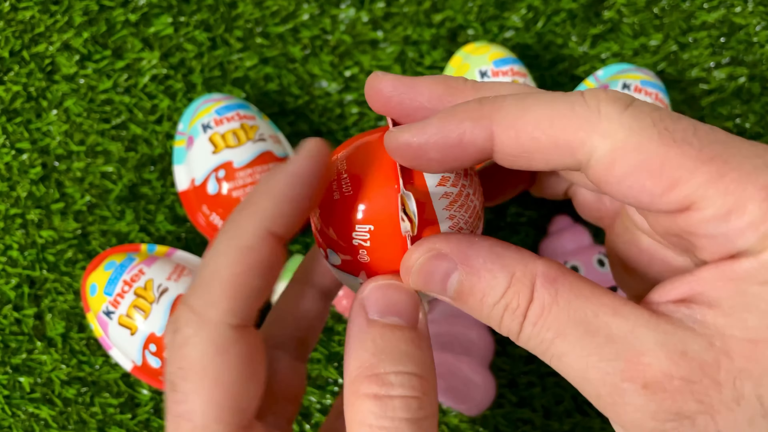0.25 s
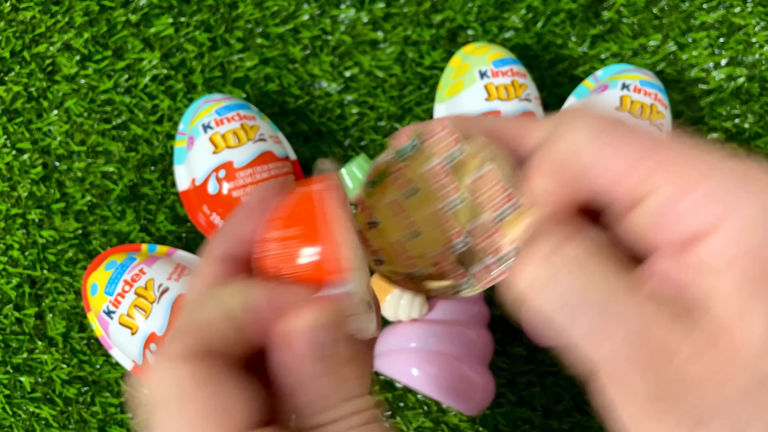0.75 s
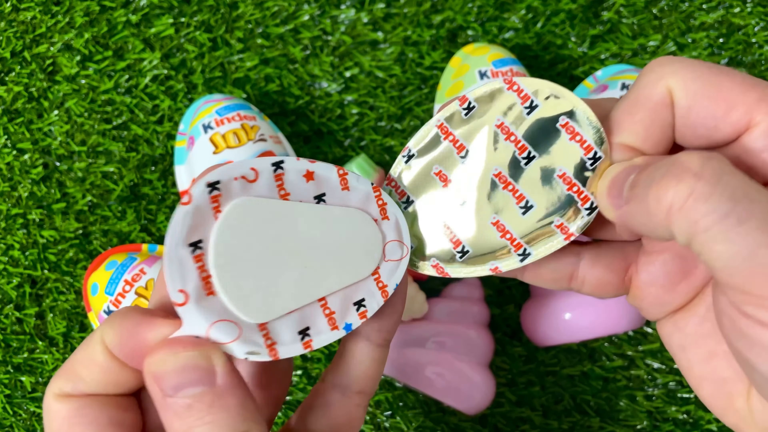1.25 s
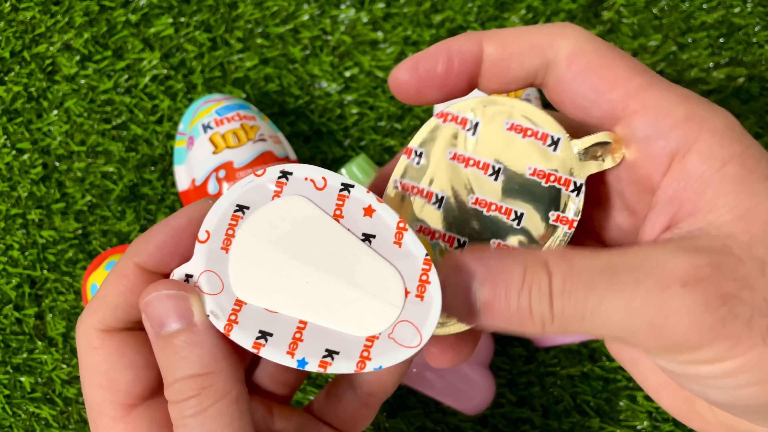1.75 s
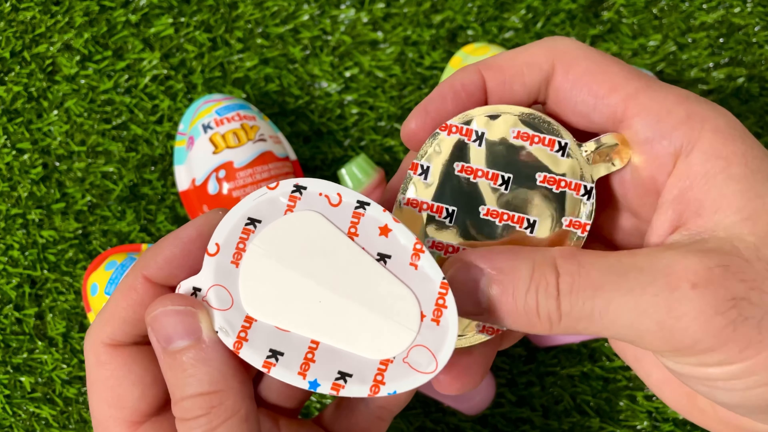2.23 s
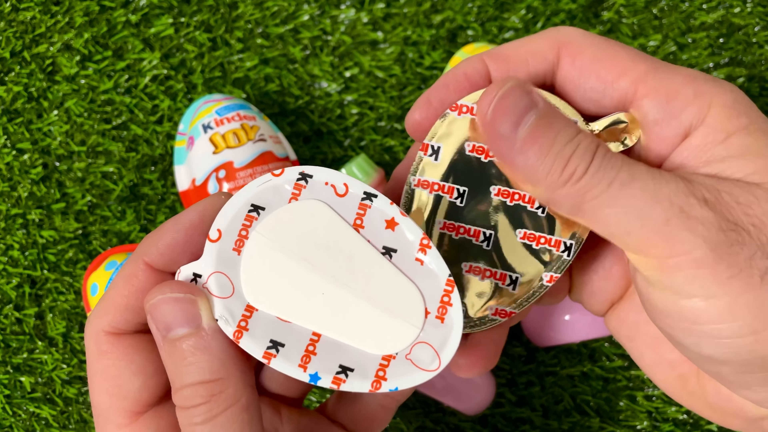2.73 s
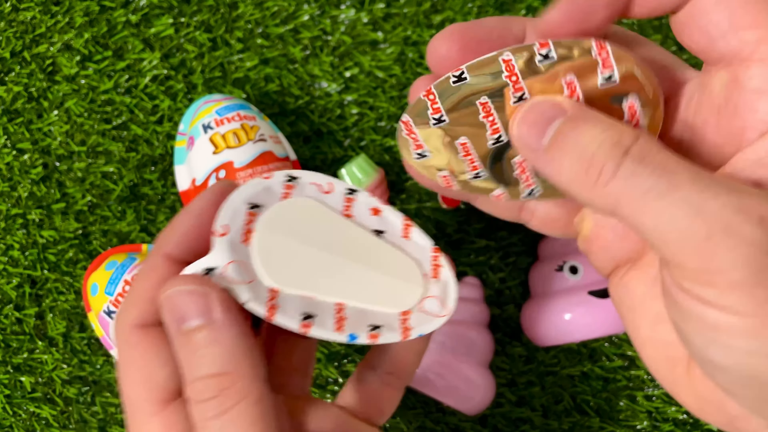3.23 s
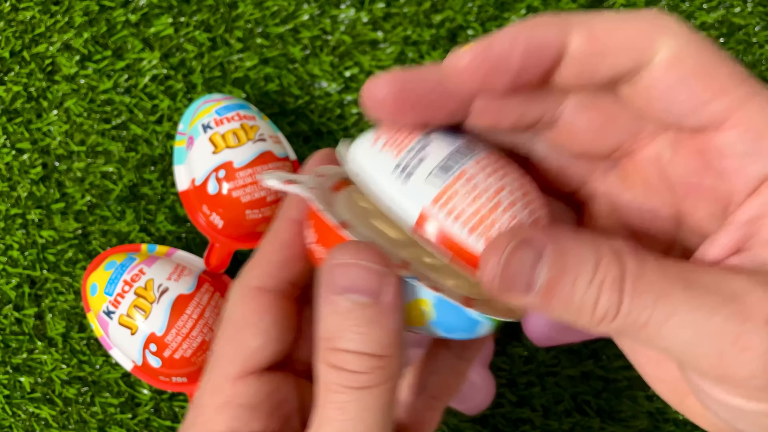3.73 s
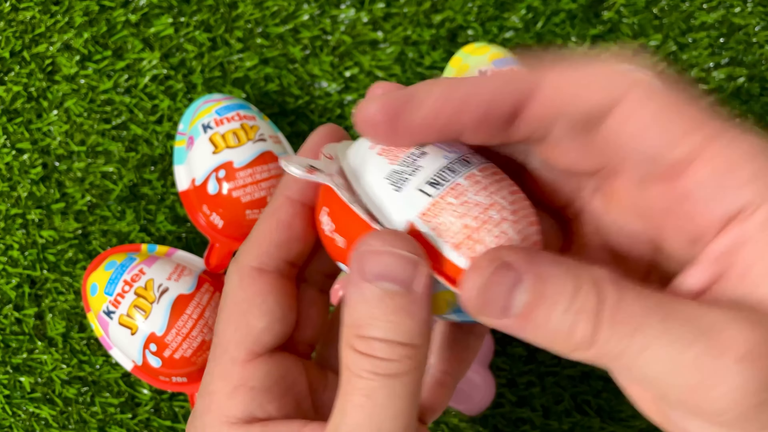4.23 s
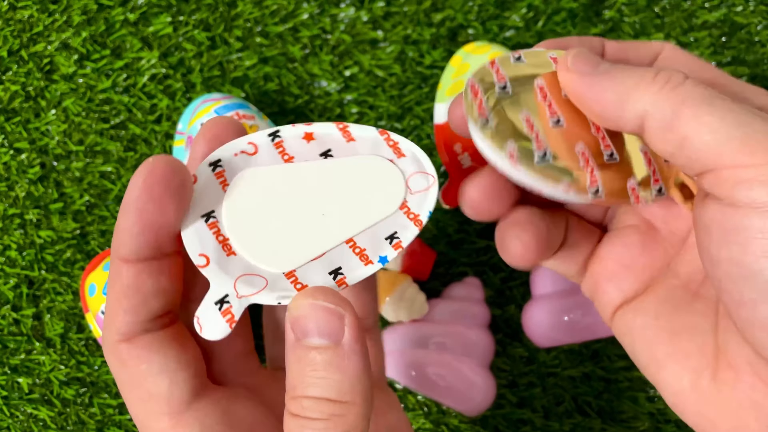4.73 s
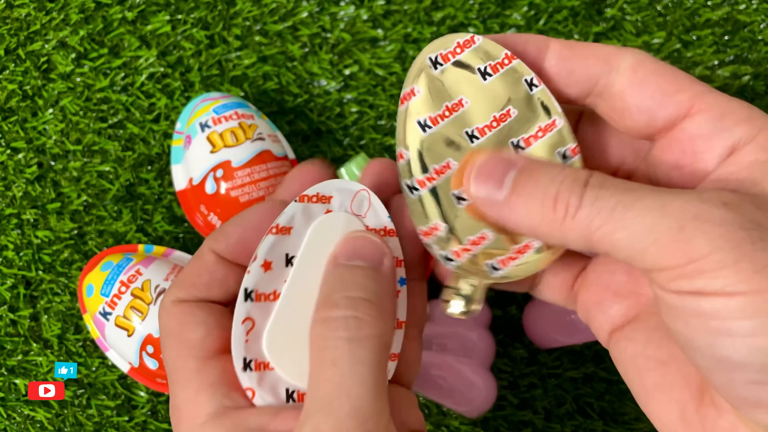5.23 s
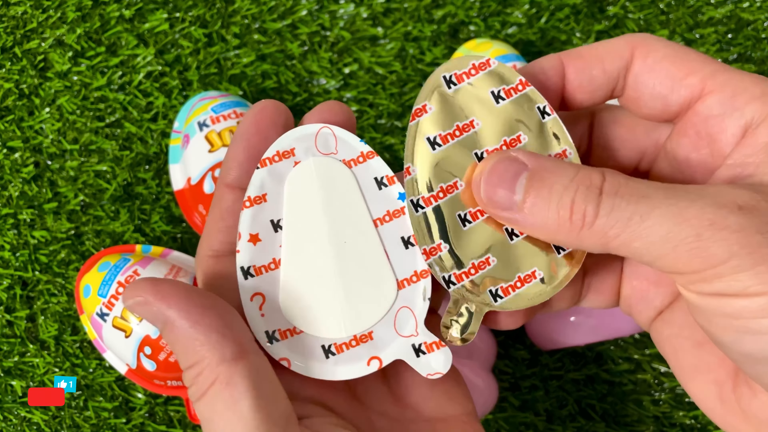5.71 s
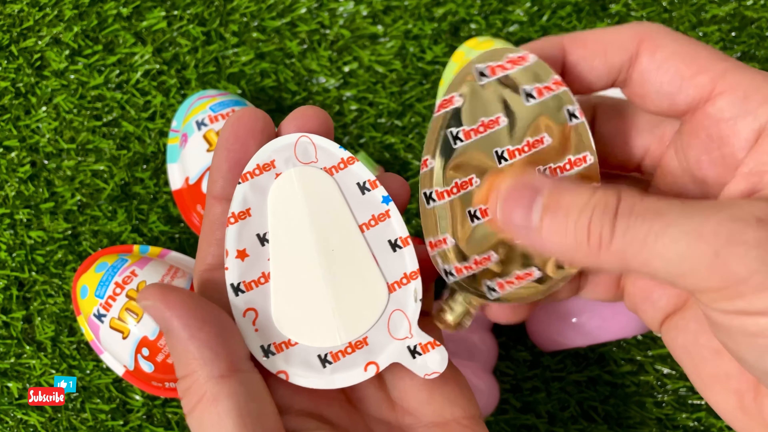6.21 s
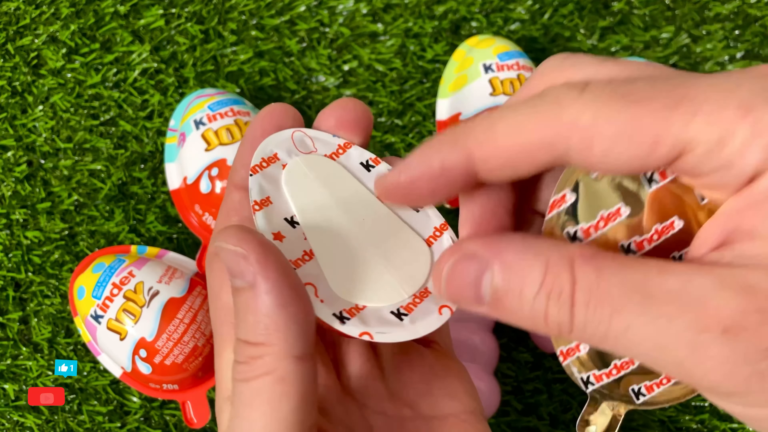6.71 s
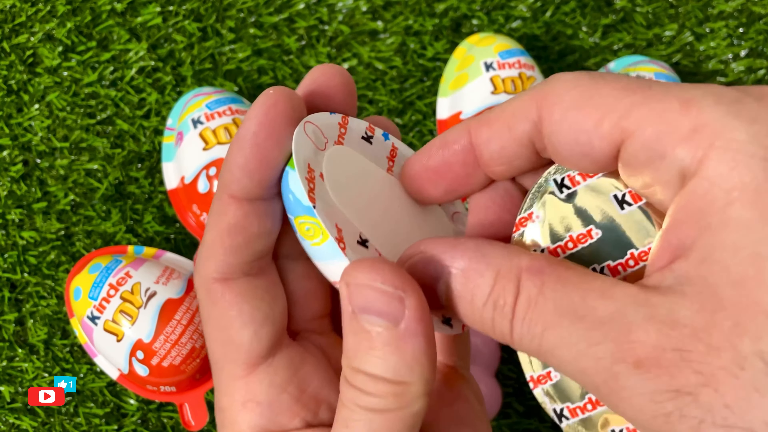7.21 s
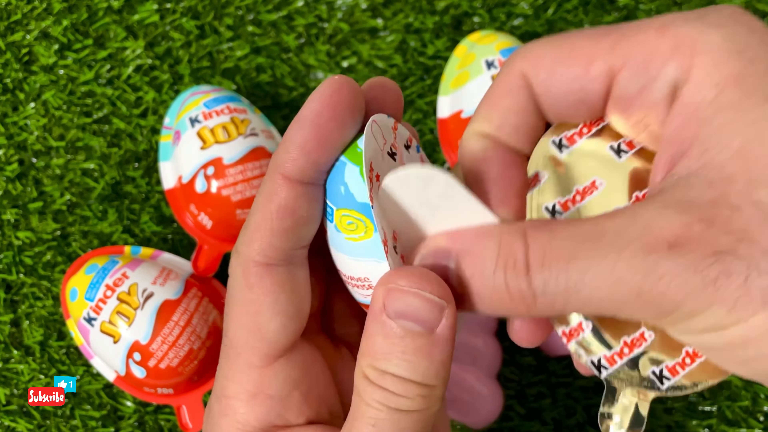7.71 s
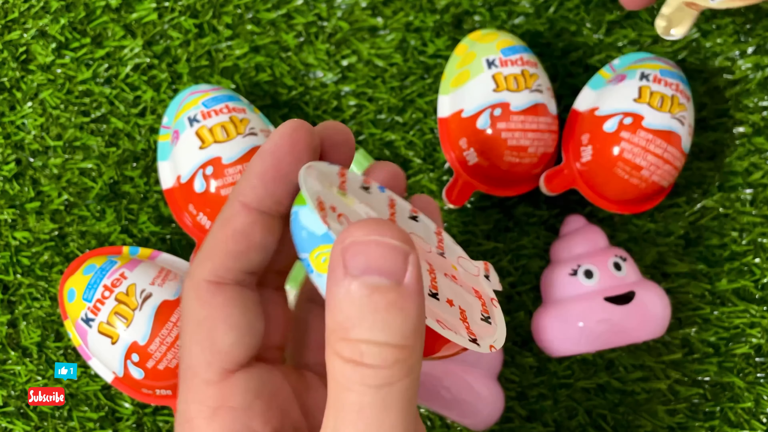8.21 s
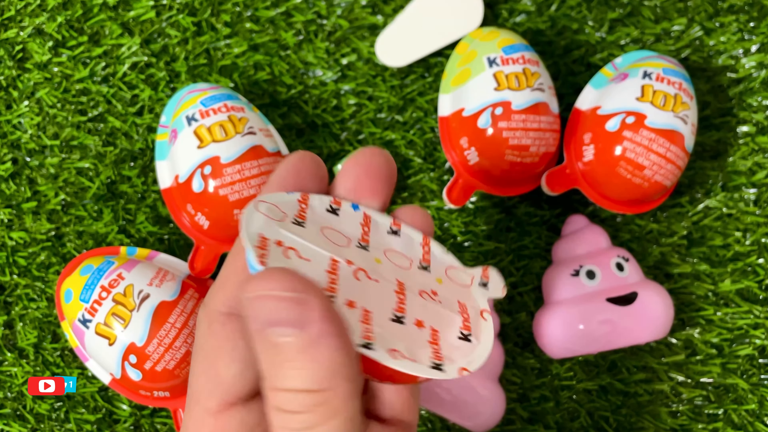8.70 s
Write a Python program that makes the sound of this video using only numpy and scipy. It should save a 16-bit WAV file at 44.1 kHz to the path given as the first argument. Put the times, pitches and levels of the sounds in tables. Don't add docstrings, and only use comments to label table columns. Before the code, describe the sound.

Fingers slide and flick over glossy film, with tiny creases crackling underneath. A lid pops loose in a tight cluster of bright snaps; buckling clicks follow in uneven groups, then soft knocks of the halves, more turning clicks, and a hard peeling buckle. It ends in faint ticks. Close phone microphone, little bass, dry small indoor space.

```python
import sys
import numpy as np
from scipy import signal
from scipy.fft import rfft, irfft, next_fast_len
from scipy.io import wavfile
from scipy.ndimage import uniform_filter1d

SR = 44100
rng = np.random.default_rng(int(sys.argv[2]) if len(sys.argv) > 2 else 0)


def inscribe(sig):
    pcm = np.round(np.clip(np.atleast_2d(sig).T, -1, 1) * 32767)
    wavfile.write(sys.argv[1], SR, pcm.astype(np.int16))


def volts_from_decibels(level):
    exponent = np.asarray(level, float) / 20
    return 10 ** exponent


N = 394694

# (time [s], peak [dB], pitch [Hz], palm thump against the peak [dB])
KNOCK_EVENTS = [
    (0.729, -44.5, 395, -15),
    (3.832, -45.5, 305, -38),
    (3.876, -53.5, 297, -37),
    (4.011, -42, 317, -24.5),
    (4.218, -43, 357, -17.5),
    (7.621, -39.5, 339, -17.5),
]


def along(table, hz):
    f, v = np.transpose(table)
    return np.interp(np.log(hz + 1), np.log(f + 1), v)


def shape(x, gain):
    size = next_fast_len(x.shape[-1])
    hz = np.arange(size // 2 + 1) * SR / size
    return irfft(rfft(x, size) * gain(hz), size)[..., :x.shape[-1]]


def hush(colour):
    x = shape(rng.standard_normal(N), lambda hz: volts_from_decibels(along(colour, hz)))
    return x / x.std()


def walk(rate):
    k = int(SR / rate)
    return uniform_filter1d(np.repeat(rng.standard_normal(N // k + 1), k), k)[:N]


def rings(hz, octaves, t60, rise, count, size=900):
    chance = rng.random((len(hz), 4, count, 1)).transpose(1, 0, 2, 3)
    step = (np.arange(count)[:, None] + chance[0]) / count - .5
    f = np.minimum(hz[:, None, None] * 2 ** (octaves * step), .45 * SR)
    slow = 2 ** (-octaves * step)
    t = (np.arange(size) - size // 4) / SR - rise * ((1 + chance[1]) * slow - 1.5)
    swell = np.exp(-(t / rise) ** 2)
    decay = np.exp(-np.log(1000) * t / (t60 * np.sqrt(slow) * (.5 + chance[2])))
    envelope = np.where(t < 0, swell, decay)
    loud = np.exp(-4.0 * step ** 2) / np.sqrt(slow)
    burst = (envelope * loud * np.sin(2 * np.pi * (f * t + chance[3]))).sum(axis=1)
    return burst / np.abs(burst).max(axis=1, keepdims=True)


def place(s, bursts):
    size = bursts.shape[1]
    at = (s * SR).astype(int)[:, None] + np.arange(size)
    return np.bincount(at.ravel(), bursts.ravel(), N + size)[size // 4:][:N]


def air():
    # (frequency [Hz], level [dB])
    tone_colour = [(12, -44.5), (20, -19), (53, -6), (110, -12.5), (158, -11.5), (210, -18), (280, -15),
                   (520, -28.5), (3250, -40), (6180, -27.5), (6720, -17), (7950, -59.5), (16000, -38.5)]
    # (frequency [Hz], side minus mid [dB])
    tone_width = [(100, -17.5), (700, 7), (2400, 5), (7000, -9), (15000, 2.5)]
    mid = hush(tone_colour)
    side = shape(hush(tone_colour), lambda hz: volts_from_decibels(along(tone_width, hz)))
    return volts_from_decibels(-73.5) * np.array([mid + side, mid - side])


def touch():
    # (start [s], length [s], rub [dB], gloss: hiss against the rub [dB])
    slide_events = [(0.067, 0.39, -72.5, 6), (0.562, 0.044, -68.5, 15.5), (0.74, 0.14, -49.5, 3.5),
                    (0.927, 0.13, -59, -37), (1.419, 0.35, -59.5, -3), (1.56, 0.12, -64, 4),
                    (1.838, 0.35, -52, -5.5), (2.253, 0.53, -58.5, -3), (2.887, 0.77, -64, -2.5),
                    (3.462, 0.084, -56.5, 6.5), (3.855, 0.087, -56, -1), (4.021, 0.037, -55.5, -2),
                    (4.238, 0.06, -51, -3), (4.594, 0.046, -71.5, 15), (4.646, 0.16, -57, 2.5),
                    (4.841, 0.096, -47, -2.5), (5.086, 0.33, -56, 7.5), (5.458, 0.17, -61.5, 5.5),
                    (5.882, 0.82, -69.5, 5.5), (6.618, 0.22, -70, 2), (6.942, 0.3, -62, 6),
                    (7.273, 0.18, -55.5, -11), (7.424, 0.43, -48.5, -0.5), (8.018, 0.009, -43.5, -2),
                    (8.1, 0.16, -59.5, 3), (8.328, 0.68, -67.5, 0)]
    # (time [s], rub [dB])
    flick_events = [(0, -63), (0.132, -64.5), (0.226, -59.5), (0.749, -39.5), (1.105, -57), (3.223, -52),
                    (3.377, -47.5), (4.479, -62), (4.535, -50), (5.121, -47.5), (5.396, -57), (6.05, -71),
                    (6.512, -41), (6.574, -43), (6.882, -48), (7.66, -47), (8.89, -56)]
    slide_attack, slide_release, flick_attack, flick_release = 598.5, 249, 599, 448.5
    flick_gloss_db, resting_db = 8.5, -88
    t = np.arange(0, N, 100)[:, None] / SR
    s, length, db, gloss_db = np.transpose(slide_events)
    slides = db - slide_attack * np.maximum(s - t, 0) - slide_release * np.maximum(t - s - length, 0)
    s, db = np.transpose(flick_events)
    flicks = db - flick_attack * np.maximum(s - t, 0) - flick_release * np.maximum(t - s, 0)
    power = volts_from_decibels(2 * np.hstack([slides, flicks]))
    total = power.sum(axis=1) + volts_from_decibels(2 * resting_db)
    gloss = power @ np.append(gloss_db, flick_gloss_db + 0 * s) / total
    return [np.interp(np.arange(N) / SR, t[:, 0], v) for v in (10 * np.log10(total), gloss)]


def rub():
    # (frequency [Hz], level [dB])
    rub_colour = [(350, -29.5), (800, -19), (1500, -3), (2600, -1.5), (4000, -5), (6000, -20.5)]
    # (frequency [Hz], level [dB])
    hiss_colour = [(2500, -23.5), (4000, -4.5), (6500, -4), (9500, -3), (12000, -7.5), (14000, -18.5),
                   (16500, -40)]
    held, gloss = touch()
    pressure = held + 2.5 * walk(70) + 3.2 * walk(700)
    film = hush(rub_colour) + volts_from_decibels(gloss) * hush(hiss_colour)
    out = 0
    for hz in 400 * 2 ** np.arange(0, 5.6, .5):
        patch = shape(film, lambda f: np.cos(np.pi * np.clip(np.log2((f + 1) / hz), -.5, .5)) ** 2)
        out = out + volts_from_decibels(2.5 * walk(13) + 1.5 * walk(60)) * patch
    return volts_from_decibels(pressure - 7.5) * out


def crackle(count=1500):
    per_s, crackle_db, spread_db = 160, 1, 11
    chance = rng.random((count, 3)).T
    s = np.cumsum(-np.log(1 - chance[0])) / per_s
    db = np.interp(s * SR, np.arange(N), touch()[0]) + crackle_db + spread_db * chance[1] ** 2
    pitch = 1600 * 2 ** (1.8 * chance[2])
    tiny = volts_from_decibels(db)[:, None] * rings(pitch, 0.87, 0.00094, 0.00017, count=3, size=300)
    inside = s < N / SR
    return place(s[inside], tiny[inside])


def crease(s, peak_db, panel_hz, hollow_db, crisp_db, foil_db, edge_db):
    same = np.ones(len(s))

    def part(delay, db, *ring, count):
        return place(s + delay, volts_from_decibels(peak_db + db)[:, None] * rings(*ring, count=count))

    panel = part(-.0002, 1.0, panel_hz, 1.7, 0.0066, 0.00035, count=11)
    hollow = part(0.00085, hollow_db - 13.5, 750 * same, 1.1, 0.00027, 0.0011, count=4)
    crisp = part(-.0003, crisp_db - 2.0, 5800 * same, 0.97, 0.0054, 0.00032, count=7)
    foil = part(-.0004, foil_db - 0.85, 10800 * same, 0.91, 0.008, 0.00032, count=9)
    edge = part(-.0004, foil_db + edge_db, 13900 * same, .45, .002, .0003, count=4)
    return panel + hollow + crisp + foil + edge


def clicks():
    # (time [s], peak [dB], panel pitch [Hz], brightness [dB])
    pull_ticks = [(0.1619, -46.5, 2500, -16), (0.253, -49.5, 2420, -17), (0.555, -44, 3660, 16),
                  (0.561, -35.5, 3570, 3), (0.6039, -31.5, 2260, -13), (0.6414, -63, 3910.0, 23.5),
                  (0.686, -33.5, 3730, 5.5), (0.7004, -30, 2760, -9), (0.8262, -28, 2640, -15.5),
                  (0.831, -24.5, 2860, -11), (0.88, -33.5, 2950, -4), (0.923, -27, 2180, -23),
                  (0.95, -30.5, 2160, -7.5), (1.021, -40.5, 2040, -16.5), (1.4071, -36, 1840, -29.5)]
    press_ticks = [
        (1.93, -26, 2030, -23),
        (2.2438, -24.5, 1650, -25),
        (2.508, -29, 2100, -5.5),
        (2.6467, -27, 2450, -22),
        (2.6839, -27.5, 2130, -11.5),
        (2.811, -43, 1460, -19.5),
        (3.0934, -26.5, 2840, -19),
        (3.154, -43, 1980, -29),
    ]
    tap_ticks = [
        (3.6895, -40.5, 2270, 4.5),
        (4.0117, -21, 1510, -2),
        (4.2231, -24, 2045, 1),
        (4.2817, -36.5, 1396, 1),
        (4.3485, -24.5, 2380, -16),
    ]
    turn_ticks = [(4.6468, -20.5, 3010, -11), (4.7009, -37.5, 2100, 2), (4.993, -30, 1690, -7.5),
                  (5.1209, -24, 1900, -25), (5.169, -34.5, 4070, 2), (5.327, -39, 2770, 1),
                  (5.367, -31.5, 3870, 4), (5.4168, -31, 2790, -25.5), (5.8726, -32.5, 3100, -13.5),
                  (6.19, -31.5, 3270, -24), (6.5142, -21.5, 3930, -7), (6.517, -27, 3730, -17)]
    peel_ticks = [(7.229, -21.5, 1860, -15), (7.391, -26, 2230, 7), (7.478, -21.5, 1910, -11),
                  (7.4962, -23, 1850, -26), (7.5854, -16.5, 2020, -5), (7.651, -24.5, 2700, -10),
                  (7.721, -31, 1490, -16), (7.9271, -21, 1710, -10), (8.1085, -14.5, 1620, -6.5),
                  (8.376, -45.5, 1717, -16), (8.419, -49.5, 1990, -21), (8.4692, -43.5, 2005, 5.5),
                  (8.496, -45.5, 1710, -18.5), (8.9004, -29.5, 1490, -4), (8.9142, -41, 1610, -3)]
    # (time [s], peak [dB], panel pitch [Hz],
    # brightness [dB])
    fine_ticks = [(0.1493, -50, 2400, -15), (0.249, -47.5, 2370, -15), (0.5462, -59, 2657, 6.5),
                  (0.551, -64, 3690.0, 14), (0.5686, -45.5, 3044, 6), (0.5848, -61.5, 2943, 10),
                  (0.6127, -46, 3120, -3), (0.6357, -61.5, 3986, 18), (0.6898, -36.5, 3260, 1),
                  (0.7163, -38.5, 2527, 4), (0.7687, -28, 2705, 3), (0.7817, -36, 2550, -3),
                  (0.7931, -30, 2940, 2.5), (0.8175, -27, 2570, -16), (0.8599, -21, 2230, -17),
                  (0.9398, -25, 1950, -17), (0.9897, -19.5, 2070, -25), (1.0248, -45, 2360, -20),
                  (1.816, -47.5, 2500, -15), (1.8976, -32, 2144, -34), (2.009, -30, 2200, -12),
                  (2.218, -43, 1650, -19), (2.32, -33, 2255, -23), (2.352, -35, 2070.0, -14),
                  (2.3652, -49, 2390.0, 10), (2.389, -29, 1540, -31), (2.5046, -32, 2050, -21),
                  (2.5103, -21, 1820, -13.5), (2.5601, -31, 2070, -22.5), (2.6214, -33.5, 2150, -10),
                  (2.8462, -36, 1730.0, -29), (2.9584, -14.5, 2860, -18), (3.196, -29.5, 2650, -1),
                  (3.2924, -43, 2350, -5), (3.4023, -63, 2550.0, -16), (3.4721, -49, 2530, -16),
                  (3.7151, -46.5, 3760, 5), (3.8493, -26, 3180, -1), (4.0215, -32, 1850, -3),
                  (4.0613, -48.5, 2820, 7), (4.0686, -37.5, 2740, -12), (4.218, -40.5, 3250, 4),
                  (4.2306, -33, 1600, -7), (4.2395, -57, 2790.0, 16), (4.2568, -43, 2130, 4),
                  (4.2852, -48, 2670, 15), (4.2897, -38, 3280, 2), (4.2944, -44, 1960, -3),
                  (4.3384, -51, 2380, -20), (4.4486, -56, 2010, 8), (4.505, -44.5, 2350, 0),
                  (4.7255, -41, 3080, -7.0), (4.9088, -44, 2540, -14), (5.1062, -38, 2370, -13.5),
                  (5.208, -38, 2460, -5), (5.3708, -34.5, 2100, -2.5), (5.4267, -41, 2800, -10),
                  (5.5141, -39.5, 1950, -22), (6.0471, -46, 2590, -19), (6.0526, -50, 2290, -13.5),
                  (6.143, -36.5, 2630, 6), (6.147, -40, 2310, -16), (6.477, -37, 2820, -13.5),
                  (6.6363, -54, 3470, 9), (6.6673, -45, 3780, -2), (6.7429, -50.5, 2680.0, 1),
                  (6.8251, -50.5, 2750, 3.5), (7.2801, -46, 3260, 1), (7.522, -37.5, 3020.0, 4.5),
                  (7.6176, -27.5, 1510, -18), (7.7443, -33, 1892, -12), (7.7506, -33, 1527, -12),
                  (8.2017, -54, 2110, -19.5), (8.3403, -52, 1680, -13), (8.3467, -52, 1720, -16),
                  (8.3694, -53, 2044, -24.5), (8.5042, -46, 2180.0, -17), (8.5413, -58, 2260, 9),
                  (8.561, -51, 2300.0, 6), (8.6966, -49.5, 2090, -19), (8.8476, -54, 2560, -14.5),
                  (8.8635, -45, 2350, -18), (8.867, -52, 2670, -14.5), (8.9487, -39, 2545, -2)]
    # (time [s], peak [dB], panel pitch [Hz], hollow [dB], crisp [dB]),
    # the last two against the peak
    pull_snaps = [
        (0.7348, -13.5, 3360, 1, 8),
        (0.7333, -20, 3605, -22.5, -6),
        (0.738, -12.5, 2970, -23.5, 5),
        (0.7405, -20, 2464, -21.5, 2.5),
        (0.7432, -14.5, 2140, 4.5, 7),
        (0.7517, -19.5, 2815, -15, -10),
        (0.757, -29, 2300, -27, -4),
        (0.7613, -19, 2650, -21, 1.5),
        (0.8619, -21, 2840, -5.5, -1),
    ]
    press_snaps = [(1.8364, -14, 2320, -49, -13), (1.9512, -17, 3380, -3.5, -9.5),
                   (1.9681, -11, 2460, -14.5, -6.5), (1.995, -12.5, 2710, -18, -2),
                   (2.0392, -17, 1980, -44, -13.5), (2.057, -20.5, 2350, -34, -8.5),
                   (2.1077, -8.5, 2820, -30.5, -9), (2.1158, -12, 2520, -25, -8.5),
                   (2.1241, -12.5, 1900, -11, -5), (2.3353, -20.5, 2390, -11.5, -14),
                   (2.3719, -19.5, 2070, -5, -6.5), (2.3763, -17.5, 2710, -2.5, -0.5),
                   (2.4222, -19.5, 2560, -18.5, -8), (2.4273, -18.5, 1760, 2, -6),
                   (2.4894, -18, 1930, -36.5, -6), (2.519, -8.5, 2260, -52.5, -13.5),
                   (2.5747, -8.5, 2590, -4.5, -6), (2.6936, -15.5, 3810, -10, -6),
                   (2.7058, -17, 3070, -29, -4.5), (2.8503, -19, 2210, -38, -14.5),
                   (2.88, -9.5, 3330, -16, -10), (3.1801, -22.5, 2450, -13, -11),
                   (3.1891, -17, 2620, -52, -5.5)]
    turn_snaps = [(3.8368, -21.5, 2400, -19, 3.5), (3.8809, -20, 2430, -33, 2.5),
                  (3.8848, -14.5, 2174, -41, -4), (4.757, -15, 2280, -1.5, -5.5),
                  (4.7754, -13, 2470, -32, -5.5), (4.8068, -18.5, 2560, -2.5, -3.5),
                  (4.8203, -15, 3100, -49, -6.5), (5.0373, -16, 3850, -17, -6.5),
                  (5.4564, -16.5, 1910, -26, -2.5), (5.4693, -19, 2615, -13, -1),
                  (6.1237, -14.5, 2800, -49, -1), (6.2214, -14.5, 2950, -11.5, 1.5),
                  (6.438, -16.5, 3400, -16.5, -1)]
    peel_snaps = [(7.1441, -4.5, 2308, -25, -5.5), (7.2134, -21, 1720, -13, -20),
                  (7.4245, -18, 2780, -36.5, -11.5), (7.4311, -19, 2210, -38, -2.5),
                  (7.4471, -17, 2280, -36.5, -5.5), (7.4706, -21, 2140, -24.5, 3),
                  (7.4966, -16, 4150, -29, 7), (7.5548, -14.5, 1660, -19.5, -15),
                  (7.5598, -18.5, 1690, -17.5, -16.5), (7.5899, -10.5, 2730, -42, 6),
                  (7.621, -4, 3140, -12.5, 0.5), (7.6237, -5.5, 1620, -7, 2),
                  (7.6258, -6.5, 1330, -0.5, -7), (7.763, -22, 2050, -10, -20),
                  (7.7885, -9.5, 1860, -11.5, -3.5), (7.8124, -24.5, 2200, -42, -19),
                  (7.8167, -15.5, 1860, -32, -17.5), (7.949, -19.5, 1420, 7, -3),
                  (8.1112, -18.5, 1420, -9, -1)]
    ticks = pull_ticks + press_ticks + tap_ticks + turn_ticks + peel_ticks + fine_ticks
    s, peak_db, panel_hz, bright_db = np.transpose(ticks)
    foil_db = bright_db - 1 + 0.2 * np.minimum(bright_db, 0)
    both = crease(s, peak_db, panel_hz, -12, bright_db, foil_db, -10.5)
    for snaps, foil_share_db, edge_db in ((pull_snaps, -3, -19), (press_snaps, -4, -12),
                                          (turn_snaps, -4.5, -27), (peel_snaps, -2, -12)):
        rows = np.transpose(snaps)
        both = both + crease(*rows, rows[-1] + foil_share_db, edge_db)
    return signal.sosfilt(signal.butter(5, 600, "high", fs=SR, output="sos"), both)


def pats():
    # (time [s], peak [dB])
    pat_events = [(0.604, -55), (0.986, -50), (7.62, -31), (1.947, -53), (2.108, -47), (4.701, -53.5),
                  (5.116, -56), (5.382, -50.5), (6.221, -53), (7.784, -44.5), (8.899, -54)]
    s, peak_db = np.transpose(pat_events)
    soft = rings(362 + 0 * s, 1.4, 0.05, 0.0045, count=4, size=2000)
    return place(s + 0.0025, volts_from_decibels(peak_db)[:, None] * soft)


def swipes(size=8192):
    # (start [s], length [s], level [dB], patch pitch [Hz])
    swipe_events = [(0.643, 0.033, -58, 9500), (0.94, 0.018, -43, 2080), (1.478, 0.087, -71, 3620),
                    (1.622, 0.088, -65, 2250), (1.727, 0.053, -65, 4020), (2.14, 0.1, -71, 2500),
                    (2.872, 0.081, -62, 3900), (3.356, 0.048, -62.5, 1210), (3.554, 0.019, -65, 4980),
                    (4.696, 0.036, -59, 4600), (4.88, 0.05, -52, 2820), (5.154, 0.041, -58, 3500),
                    (5.254, 0.078, -61, 4450), (5.383, 0.059, -53, 1700), (5.405, 0.028, -49.5, 4340),
                    (6.042, 0.015, -63.5, 2250), (6.366, 0.1, -68.5, 2600), (6.406, 0.023, -55.5, 6500),
                    (6.635, 0.042, -64, 4000), (6.74, 0.013, -62, 2590), (6.802, 0.031, -66, 3100),
                    (6.93, 0.052, -64, 4060), (7.017, 0.11, -65, 3400), (7.164, 0.1, -60, 2920),
                    (7.267, 0.03, -64, 4430), (8.13, 0.086, -65, 1340), (8.463, 0.011, -62.5, 4030),
                    (8.713, 0.03, -73.5, 5150), (8.84, 0.075, -63, 2540)]
    octaves, edge_s = 0.3, 0.0016
    s, length, db, hz = (v[:, None] for v in np.transpose(swipe_events))
    t = (np.arange(size) - size // 4) / SR
    noise = rng.standard_normal((len(s), size))
    grain = shape(noise, lambda f: np.exp(-(np.log2((f + 1) / hz) / octaves) ** 2))
    outside = np.maximum(np.maximum(-t, t - length), 0)
    hold = np.exp(-(outside / edge_s) ** 2)
    rustle = volts_from_decibels(db) * hold * grain / grain.std(axis=1, keepdims=True)
    return place(s[:, 0], rustle) * volts_from_decibels(0.99 * walk(330))


def knocks():
    s, peak_db, hz, thump_db = np.transpose(KNOCK_EVENTS)
    t = np.arange(2400) / SR
    turns = hz[:, None] * (0.3 * t + 0.0098 * (1 - np.exp(-t / 0.0082)))
    cup = (1 - np.exp(-t / 0.0014)) * np.exp(-t / 0.0063) * np.sin(2 * np.pi * turns)
    cup = place(s + 600 / SR + 0.0037, volts_from_decibels(peak_db + 17.0)[:, None] * cup)
    thump = rings(100 + 0 * hz, 1.0, 0.051, 0.00076, count=4, size=4000)
    palm = place(s + 0.0028, volts_from_decibels(peak_db + thump_db + 15.0)[:, None] * thump)
    return cup + palm


def hum():
    # (pitch [Hz], waver [Hz], level [dB], start [s], end [s])
    motors = [
        (160, 1.2, -81, 3.35, 6.9),
        (143, 2.5, -83, 1.4, 2.35),
    ]
    out = 0
    for hz, waver_hz, db, start, end in motors:
        x = np.sqrt(2) * np.sin(2 * np.pi * np.cumsum(hz + waver_hz * walk(18)) / SR) * volts_from_decibels(3.2 * walk(2.6))
        fade = np.interp(np.arange(N) / SR, [start - .1, start, end, end + 0.22], [0, 1, 1, 0])
        out = out + volts_from_decibels(db) * x * fade
    return out


def table_top():
    # (frequency [Hz], level [dB], t60 [s])
    table_modes = [(157, -28, 0.44), (222, -17.5, 0.58), (320, -26.5, 0.35)]
    s, peak_db = np.transpose(KNOCK_EVENTS[1:])[:2]
    t = np.arange(16000) / SR
    pair = rng.random((len(s), 2, 1))
    ring = 0
    for hz, db, t60 in table_modes:
        twin_hz = hz * (1 + .06 * (pair[:, 0] - .5))
        twin = 0.44 * np.sin(2 * np.pi * (twin_hz * t + pair[:, 1]))
        ring = ring + volts_from_decibels(db - 5 - 60 * t / t60) * (np.sin(2 * np.pi * hz * t) + twin)
    ring = ring * (1 - np.exp(-t / 0.017))
    return place(s + 4000 / SR, volts_from_decibels(peak_db + 7.5)[:, None] * ring)


def ports(x, lead):
    # (frequency [Hz], lead of the left port [rad])
    port_phase = [(280, .15), (550, .7), (1000, .05), (2500, .35), (3300, .7), (5300, .25), (7900, 1.7),
                  (10000, 2.3), (12000, 2.96)]
    # (frequency [Hz], left minus right [dB])
    port_balance = [(100, -1.3), (500, -2.8), (1200, -1.1), (5000, -1.0), (9000, 0)]

    def tilt(hz):
        return volts_from_decibels(along(port_balance, hz) / 2) * np.exp(.5j * lead * along(port_phase, hz))

    return np.array([shape(x, tilt), shape(x, lambda hz: 1 / tilt(hz))])


def room(x, size=22050):
    # (delay [s], level [dB])
    echoes = [
        (.0022, -27.5),
        (.0045, -24),
        (0.0103, -26),
    ]
    # (frequency [Hz], t60 [s])
    room_t60 = [(200, 0.35), (900, .17), (2500, 0.16), (12000, .09)]
    # (frequency [Hz], tail against the direct sound [dB])
    room_level = [(150, -21), (270, -10.5), (1200, -37), (3000, -26.5), (8000, -25.5), (13000, -41.5)]
    t = np.arange(size) / SR
    delay, echo_db = np.transpose(echoes)
    early = place(delay, volts_from_decibels(echo_db)[:, None])[:size]
    shared, own = rng.standard_normal(size), rng.standard_normal((2, size))
    tail = 0
    for hz in 125 * 2. ** np.arange(0, 7.1):
        noise = shared + min(hz / 900, 2400 / hz) * own
        band = shape(noise, lambda f: np.exp(-(np.log2((f + 1) / hz) / 1.6) ** 2))
        fade = (1 - np.exp(-t / 0.00012)) * np.exp(-np.log(1000) * t / along(room_t60, hz))
        tail = tail + volts_from_decibels(along(room_level, hz)) * band * fade / np.sqrt(np.sum(fade ** 2))
    return signal.fftconvolve(x, early + tail, axes=1)[:, :N]


def scene():
    hits = clicks() + knocks() + table_top() + pats()
    opening = np.arange(N) < 1.3 * SR
    pack = ports(hits * opening, 0.66) + ports(hits * ~opening, 1.0)
    hands = pack + ports(rub() + crackle() + swipes(), 1.0)
    return hands + room(hands) + air() + hum()


def top_cut(x):
    return signal.sosfilt(signal.butter(12, 16810, fs=SR, output="sos"), x)


def record(dry):
    ceiling, top_hz = .72, 16100
    rounded = dry / (1 + (dry / ceiling) ** 6) ** (1 / 6)
    mix = signal.sosfilt(signal.ellip(8, .2, 70, top_hz, fs=SR, output="sos"), rounded)
    return top_cut(mix)


dry = scene()
out = record(dry)
inscribe(out)
```